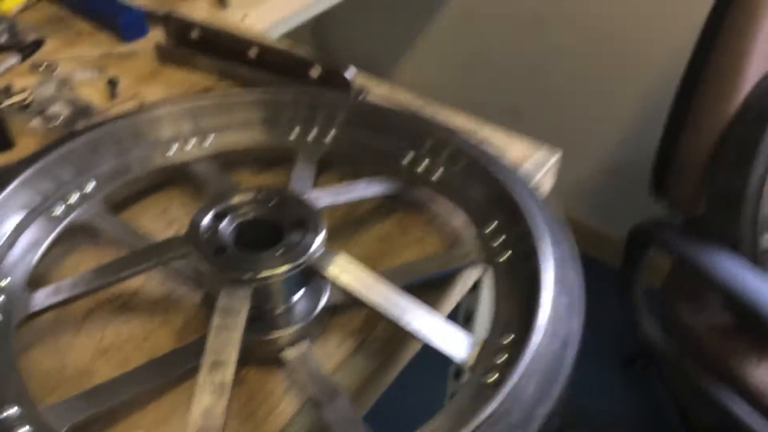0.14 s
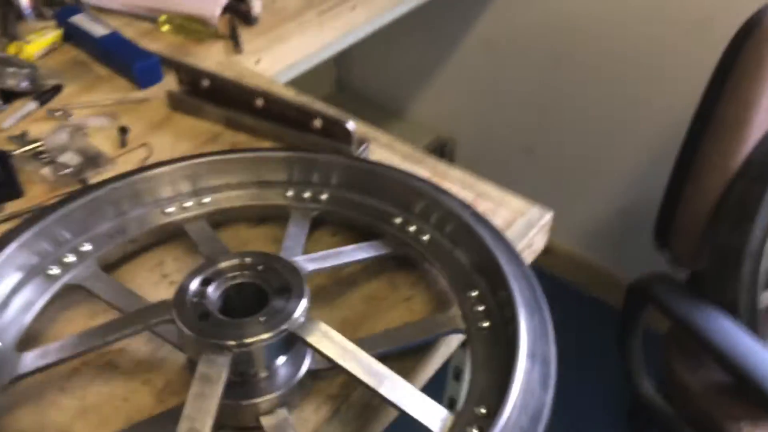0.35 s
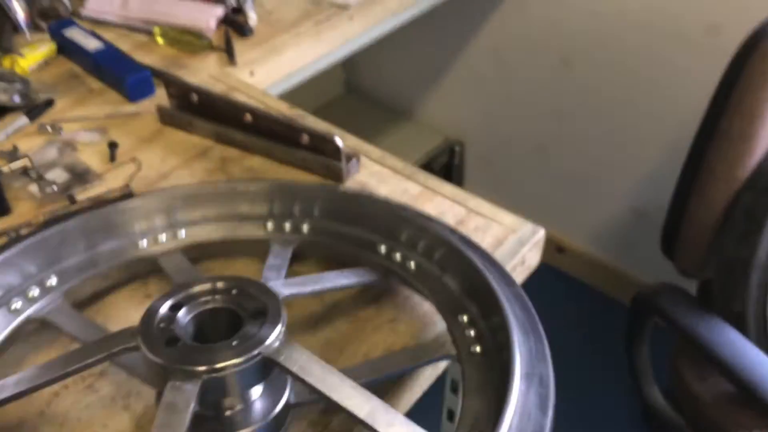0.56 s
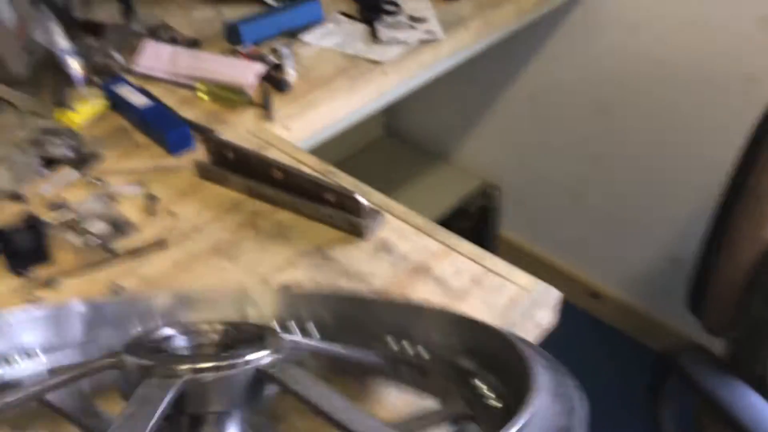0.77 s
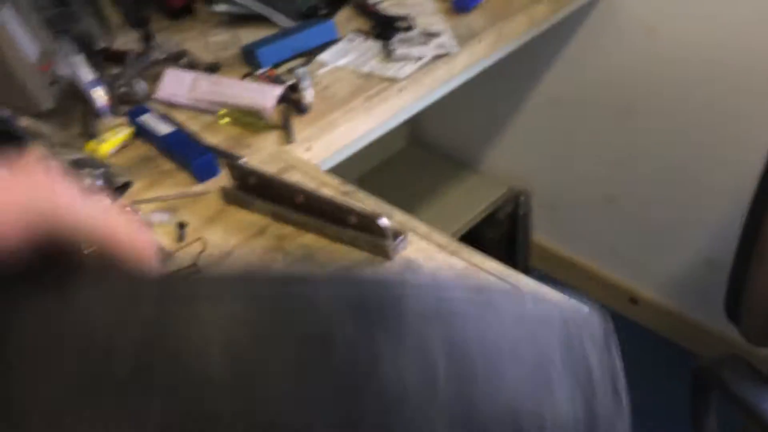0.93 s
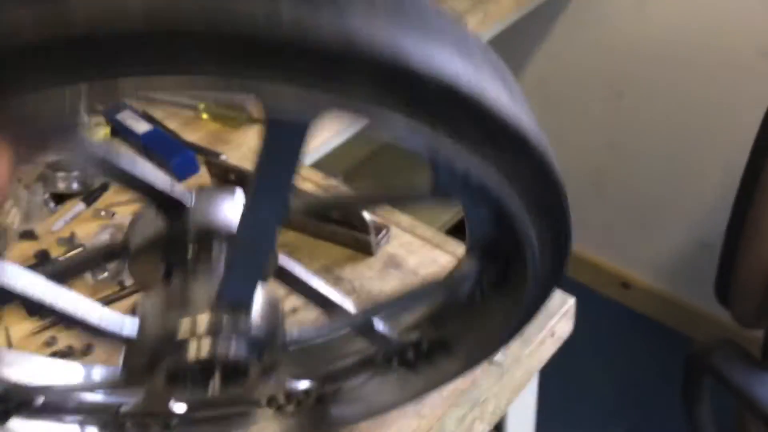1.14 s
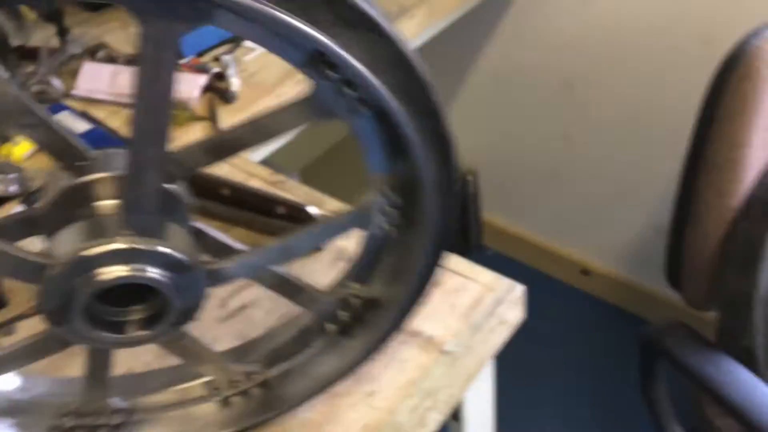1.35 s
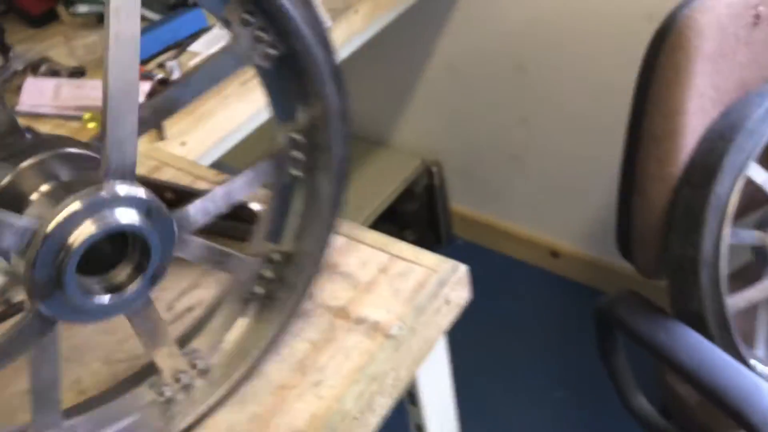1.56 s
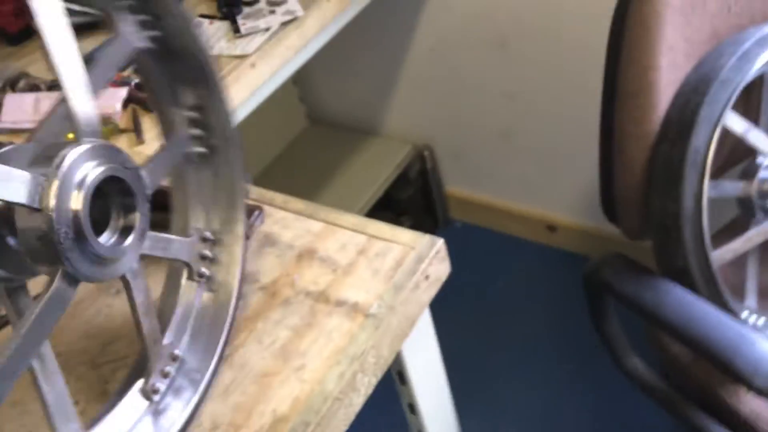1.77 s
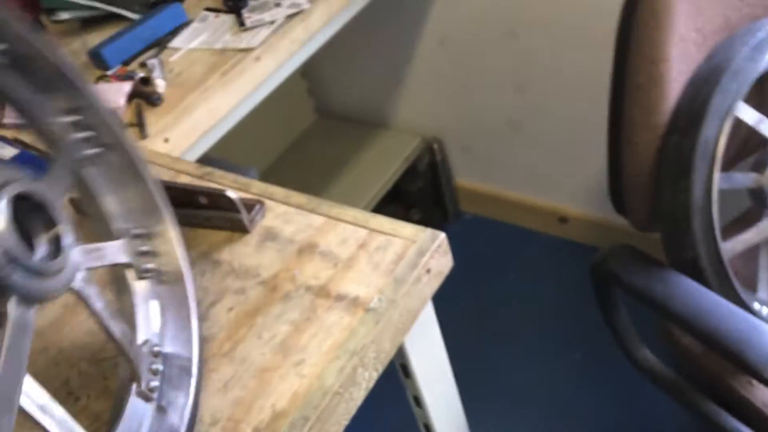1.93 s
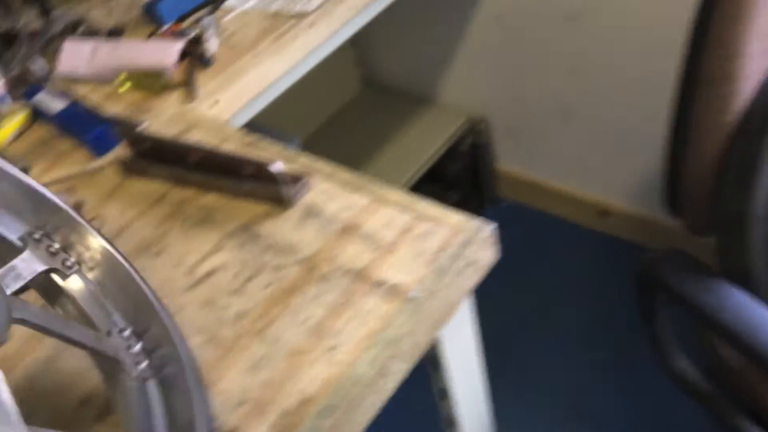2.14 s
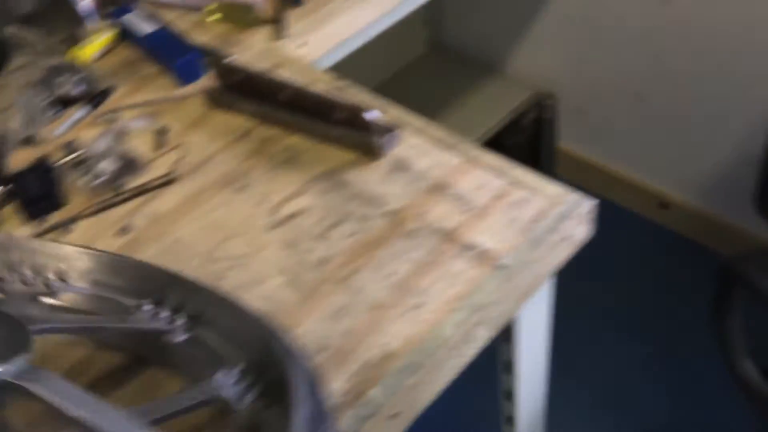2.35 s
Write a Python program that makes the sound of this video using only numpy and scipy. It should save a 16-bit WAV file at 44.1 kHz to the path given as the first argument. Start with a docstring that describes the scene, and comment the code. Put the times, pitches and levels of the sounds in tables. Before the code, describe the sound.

A metal wheel lands on a wooden workbench with a thud and a brief ringing clatter. It is tipped up with a softer bump and rattle, then turned with small knocks and rubbing, close by in a small workshop.

```python
"""A small workshop, one microphone close to a wooden workbench, a little room behind the direct sound.
A spoked metal wheel is set down: the board thuds in its low modes, then metal clatters and rings on it.
The wheel is tipped up with a softer bump and a rattle, and turned on its tyre with small knocks.
Hands and sleeves rub on it with a grainy hiss; it squeaks faintly and the bench rumbles as it rolls."""
import sys
import numpy as np
from scipy import signal
from scipy.fft import rfft, irfft
from scipy.io import wavfile

SR = 44100
rng = np.random.default_rng(int(sys.argv[2]) if len(sys.argv) > 2 else 0)


def to_wav(sig):
    """Store sig (one row per channel, or 1-D mono) as 16-bit WAV at the path in sys.argv[1].

    Samples outside -1..1 are clipped; the rate is SR.
    """
    pcm = np.clip(np.atleast_2d(sig), -1, 1) * 32767
    pcm = np.round(pcm).astype(np.int16)
    wavfile.write(sys.argv[1], SR, pcm.T)  # frames by channels


N = 110250
TIME = np.arange(N) / SR
RING_TIME = TIME[:SR * 3 // 4]  # seconds since a contact

# reverberation of the workshop (frequency [Hz], t60 [s])
ROOM_T60 = [(60, 0.25), (250, 0.52), (8000, 0.43), (15000, 0.2)]
# room tone (frequency [Hz], relative level [dB])
AIR_COLOUR = [(30, -4.5), (150, 8.5), (225, 0.5), (266, 12), (330, 0), (1100, -2), (1750, 3), (2400, -7),
              (4000, -3.5), (15500, -16)]
# hands sliding over the rim (time [s], level [dB])
RUB_LEVEL = [(0, -59), (.15, -64), (.5, -59.5), (.6, -55), (.76, -51), (.9, -52.5), (.97, -58),
             (1.05, -65.5), (1.35, -75.5), (1.88, -74.5), (2.07, -64), (2.18, -68.5), (2.38, -60),
             (2.5, -60)]
# spectrum of the rubbing (frequency [Hz], relative level [dB])
RUB_COLOUR = [(60, -9.5), (220, 0.5), (262, 13.5), (300, 6.5), (900, 1), (1900, 0), (2450, -6.5),
              (3200, -1), (3800, -5.5), (4300, -4), (5300, -11.5), (6400, -8.5), (15500, -24)]
# rumble of the bench under the tyre (time [s], level [dB])
ROLL_LEVEL = [(0, -70.5), (.2, -62.5), (.45, -55), (.55, -61), (.66, -53), (.86, -47.5), (.96, -64.5),
              (1.03, -58), (1.12, -58.5), (1.21, -57), (1.4, -56.5), (1.59, -66.5), (1.82, -57),
              (2.0, -63.5), (2.5, -57)]
# spectrum of the rumble (frequency [Hz], relative level [dB])
ROLL_COLOUR = [(20, -27.5), (45, 0.5), (57, 6.5), (71, 6.5), (84, -5), (190, -5), (270, -21.5),
               (340, -32.5), (2200, -48.5)]
# swishes of a sleeve (peak time [s], rise [s], fall [s], level [dB])
SWISHES = [(0.111, 0.085, 0.091, -70.5), (.72, 0.087, 0.023, -56.5), (0.771, 0.014, 0.0052, -53.5),
           (.89, 0.052, 0.024, -67), (1.19, 0.06, 0.051, -61), (1.3, 0.036, 0.037, -68),
           (2.055, .02, 0.024, -71), (2.149, 0.0038, 0.0036, -66.5), (2.49, 0.12, .1, -70)]
# spectrum of a swish (frequency [Hz], relative level [dB])
SWISH_COLOUR = [(300, -21), (2600, -10.5), (3800, 0), (5500, -6), (6900, -3), (8200, -0.5), (9700, -5.5),
                (13000, -6.5), (15500, -9.5)]
# small knocks of hand and tyre (time [s], level [dB], pitch [Hz])
KNOCKS = [(0.086, -53, 1100), (0.192, -49, 79.4), (1.013, -47.5, 325), (1.232, -57, 704), (1.926, -51, 328),
          (2.0738, -36, 173), (2.110, -39.5, 197), (2.149, -48.5, 4400), (2.2478, -43.5, 540),
          (2.3037, -47, 1030)]
# the wheel landing on the board (time [s], gain [dB], treble cutoff [Hz])
BLOWS = [(0.2432, 0, 1280), (0.2444, -0.5, 273), (0.2524, -8.5, 1140), (0.2668, -6, 523),
         (0.3191, -12.5, 251), (0.611, -31.5, 151), (0.738, -3, 81), (0.7572, -18.5, 228),
         (.7787, -20, 113), (0.7973, -22, 71), (0.8219, -34, 80)]
# modes of the bench top (frequency [Hz], level [dB])
BENCH_MODES = [(54, -33.5), (90, -27.5), (132, -18), (177, -5), (215, -32), (261, -19), (320, -19),
               (357, -13), (435, -21.5), (481, -29), (522, -21), (608, -29), (698, -29.5), (874, -28)]
# how long those modes ring (frequency [Hz], t60 [s])
BENCH_T60 = [(54, 0.34), (130, 0.049), (200, 0.12), (700, 0.26)]
# dense ring of the board and its clutter (frequency [Hz], relative level [dB])
WOOD_COLOUR = [(40, -36.5), (130, -2.5), (400, -5.5), (900, -1), (1900, -3), (2400, -15), (5500, -6),
               (15500, -11)]
# metal striking metal (time [s], gain [dB], treble cutoff [Hz], gain of the modes [dB])
METAL_CONTACTS = [(0.2442, -10, 14000, -5.5), (0.251, -5.5, 4976, 7), (0.2718, 0.5, 9500, 0),
                  (0.276, -8.5, 8000, -7.5), (.283, -7.5, 11000, 3), (.754, -18, 2400, 8.5),
                  (0.769, -26, 2200, 14)]
# modes of the wheel (frequency [Hz], level [dB], t60 [s])
WHEEL_MODES = [(1450, -41, 0.2), (1574, -37.5, .32), (1990, -39, .35), (2700, -40.5, 0.12),
               (3172, -38, .26), (3935, -39, 0.17), (4290, -42.5, 0.17), (5100, -40, 0.2),
               (5650, -36.5, .09), (6870, -37.5, 0.17), (6914, -40.5, .22), (7340, -45.5, 0.23),
               (8290, -41.5, 0.28), (8610, -39.5, 0.13), (9000, -47, 0.11), (9211, -50, .26),
               (11130, -40, 0.21), (11710, -38.5, .17), (11460, -43.5, 0.19), (13940, -53, .4),
               (14680, -42, .15)]
# crash of a metal contact (frequency [Hz], relative level [dB])
CRASH_COLOUR = [(200, -17), (900, -2.5), (2000, 6), (2500, 2), (5700, -7), (6300, -16.5), (10000, -17.5),
                (15500, -18.5)]
# sharp bite at the instant of contact (frequency [Hz], relative level [dB])
BITE_COLOUR = [(1500, -17.5), (5400, 0.5), (7500, -18.5)]
# squeaky rubs of the turning wheel (time [s], level [dB], pitch [Hz])
SQUEAKS = [(1.149, -64.5, 1850), (1.285, -70.5, 1877), (1.421, -78, 1810), (1.547, -77.5, 1694),
           (1.623, -80, 1690), (1.715, -71, 1680)]


def amp(db):
    """Decibels to gain."""
    return 10 ** (np.asarray(db) / 20)


def unit_rms(x):
    """Scales to rms 1."""
    return x / np.sqrt(np.mean(x ** 2) + 1e-20)


def at_frequency(points, hz):
    """Reads a table on a log-frequency axis."""
    f, value = np.transpose(points)
    return np.interp(np.log(hz + 1), np.log(f + 1), value)


def level(points):
    """Gain over time from a curve in dB."""
    return amp(np.interp(TIME, *np.transpose(points)))


def add(mix, s, sound):
    """Mixes a sound in at a time."""
    part = mix[max(round(s * SR), 0):][:len(sound)]
    part += sound[:len(part)]


def coloured(x, colour):
    """Gives a signal a spectrum, at rms 1."""
    gain = amp(at_frequency(colour, np.fft.rfftfreq(len(x), 1 / SR)))
    return unit_rms(irfft(rfft(x) * gain, len(x)))


def decay(t60):
    """Falls by 60 dB in t60 seconds."""
    return np.exp(-np.log(1000) * RING_TIME / t60)


def burst(colour, db, t60):
    """Dying noise: a ring too dense to hear as pitches."""
    return amp(db) * coloured(rng.standard_normal(len(RING_TIME)), colour) * decay(t60)


def lowpass(x, hz):
    """Takes off treble, as a softer contact does."""
    return signal.lfilter(*signal.butter(2, min(hz, SR / 2 - 1), fs=SR), x)


def friction(colour, grain_db, grain_s):
    """Rubbing noise that catches and slips in short grains."""
    grains = np.interp(TIME / grain_s, np.arange(N), rng.standard_normal(N))
    return coloured(rng.standard_normal(N) * amp(grain_db * grains), colour)


def room(x, wet_db, delay_s=0.0062):
    """A diffuse tail reaches the microphone after the direct sound; each band dies at its own speed."""
    hz, t, bands = signal.stft(rng.standard_normal(len(RING_TIME)), SR, nperseg=256)
    bands *= np.exp(-np.log(1000) * t / at_frequency(ROOM_T60, hz)[:, None])
    tail = signal.istft(bands, SR, nperseg=256)[1]
    tail *= np.clip(np.arange(len(tail)) / SR / delay_s - 1, 0, 1)
    return x + amp(wet_db) * signal.fftconvolve(x, tail / np.linalg.norm(tail))[:len(x)]


def room_tone():
    """The quiet, steady air of the workshop."""
    return amp(-71.5) * coloured(rng.standard_normal(N), AIR_COLOUR)


def hand_rub():
    """Hands slide over the rim, and the friction makes the metal sing faintly."""
    rub = friction(RUB_COLOUR, grain_db=2.0, grain_s=0.0034)
    damped_ring = wheel_ring() * decay(t60=0.19)
    singing = lowpass(signal.fftconvolve(rub, damped_ring)[:N], hz=4000)
    return level(RUB_LEVEL) * (rub + amp(-17) * unit_rms(singing))


def wheel_ring(partials=7):
    """Each mode of the wheel splits into close partials that beat as they die."""
    out = np.zeros(len(RING_TIME))
    for hz, db, t60 in WHEEL_MODES:
        spread_hz = 16 + 0.0047 * hz
        offsets = (np.arange(partials) + rng.random(partials)) * 2 / partials - 1
        cycles = (hz + spread_hz * offsets[:, None]) * RING_TIME + rng.random((partials, 1))
        out += amp(db) * np.sin(2 * np.pi * cycles).sum(0) / np.sqrt(partials) * decay(t60)
    return out


def tyre_roll():
    """The bench rumbles under the rolling tyre."""
    return level(ROLL_LEVEL) * coloured(rng.standard_normal(N), ROLL_COLOUR)


def sleeve_swishes():
    """Cloth brushes the wheel in swells of bright friction noise."""
    swell = np.zeros(N)
    for s, rise, fall, db in SWISHES:
        width_s = np.where(TIME < s, rise, fall)
        swell += amp(db) * np.exp(-((TIME - s) / width_s) ** 2 / 2)
    return swell * friction(SWISH_COLOUR, grain_db=1.5, grain_s=0.0021)


def knocks():
    """Dead knocks of hand and tyre: one short push each, and only the room rings on."""
    out = np.zeros(N)
    for s, db, hz in KNOCKS:
        offset_squared = (np.pi * hz * (TIME - s)) ** 2
        out += amp(db) * (2 * offset_squared - 1) * np.exp(-offset_squared)
    return room(out, wet_db=-9.5)


def bench_thuds(push_hz=454.3, push_s=0.0017, build_cycles=0.27):
    """Each blow shoves the board, which rings in low modes and a dense wooden bark."""
    push = amp(-0.5) * np.sin(2 * np.pi * push_hz * RING_TIME) * np.exp(-RING_TIME / push_s)
    modes = np.zeros(len(RING_TIME))
    for hz, db in BENCH_MODES:
        build_up = 1 - np.exp(-hz * RING_TIME / build_cycles)
        envelope = build_up * decay(at_frequency(BENCH_T60, hz))
        modes += amp(db) * np.sin(2 * np.pi * hz * RING_TIME) * envelope
    out = np.zeros(N)
    for s, db, cutoff_hz in BLOWS:
        bark = burst(WOOD_COLOUR, db=-11.5, t60=0.28)
        thud = modes + room(bark - push, wet_db=-15)
        add(out, s, amp(db) * lowpass(thud, cutoff_hz))
    return out


def metal_clatter():
    """Each metal contact is a sharp bite and a short crash that leave the wheel ringing."""
    out = np.zeros(N)
    for s, db, cutoff_hz, ring_db in METAL_CONTACTS:
        bite = burst(BITE_COLOUR, db=-25, t60=0.032)
        crash = room(burst(CRASH_COLOUR, db=-24.5, t60=0.18), wet_db=-9)
        ring = amp(ring_db) * room(wheel_ring(), wet_db=-12.5)
        add(out, s, amp(db) * lowpass(bite + crash + ring, cutoff_hz))
    return out


def squeaks(swell_s=0.016, fuzz_hz=165, rise_hz_per_s=1540):
    """Short slips as the wheel turns: each a fuzzy whistle that swells and rises a little."""
    out = np.zeros(N)
    for s, db, hz in SQUEAKS:
        t = TIME - s
        fuzz = lowpass(rng.standard_normal(N) + 1j * rng.standard_normal(N), fuzz_hz)
        cycles = (hz + rise_hz_per_s * t / 2) * t
        whistle = (fuzz * np.exp(2j * np.pi * cycles)).real
        out += amp(db) * unit_rms(whistle) * np.exp(-(t / swell_s) ** 2 / 2)
    return out


def scene():
    """Everything that reaches the microphone at the bench, in mono."""
    handling = hand_rub() + tyre_roll() + sleeve_swishes() + knocks()
    return (room_tone() + handling + bench_thuds() + metal_clatter() + squeaks())[None]


def record(dry, low_cut_hz=38, band_limit_hz=15800):
    """The microphone's bass roll-off and the recorder's band limit."""
    thinned = signal.lfilter(*signal.butter(3, low_cut_hz, "high", fs=SR), dry)
    band_limit = signal.firwin(511, band_limit_hz, window=("kaiser", 9), fs=SR)
    return signal.oaconvolve(thinned, band_limit[None], "same")


dry = scene()
out = record(dry)
to_wav(out)
```